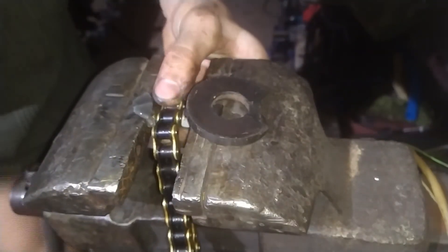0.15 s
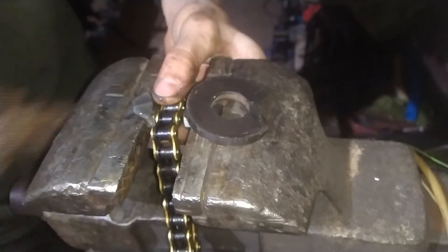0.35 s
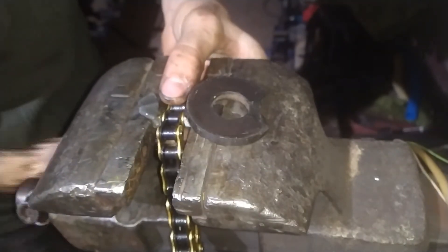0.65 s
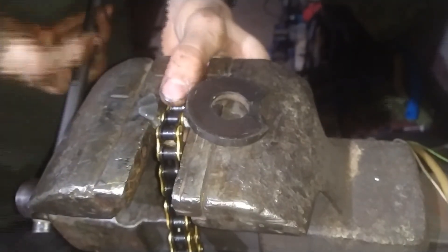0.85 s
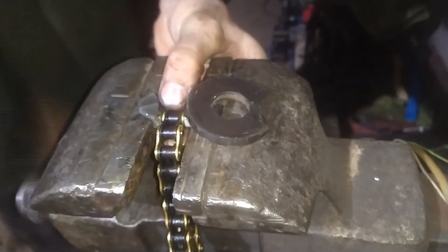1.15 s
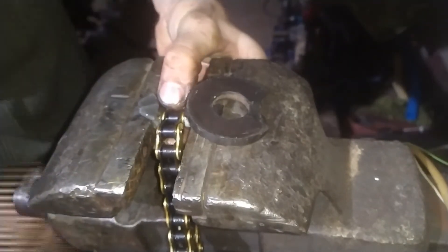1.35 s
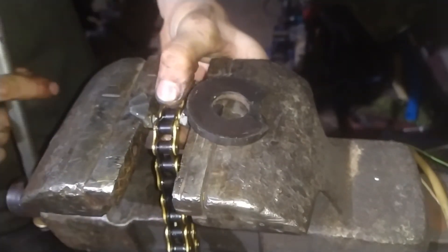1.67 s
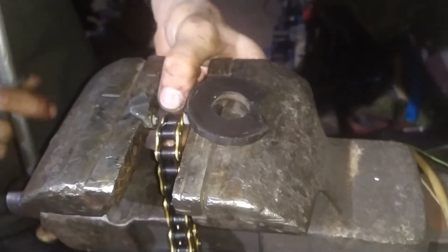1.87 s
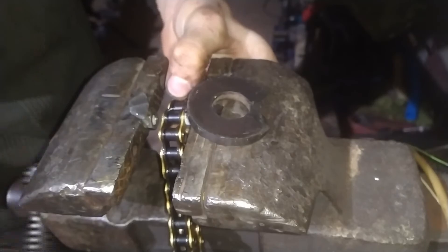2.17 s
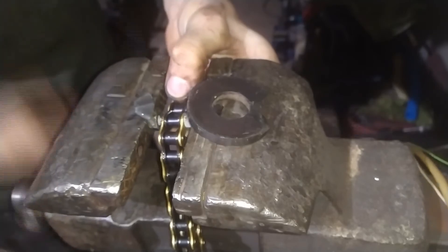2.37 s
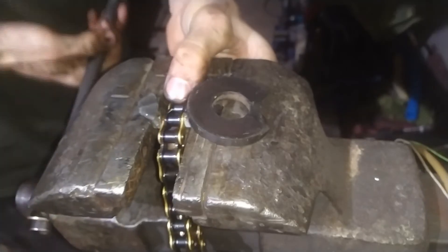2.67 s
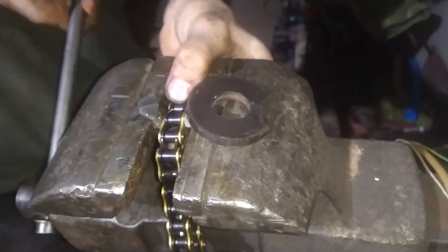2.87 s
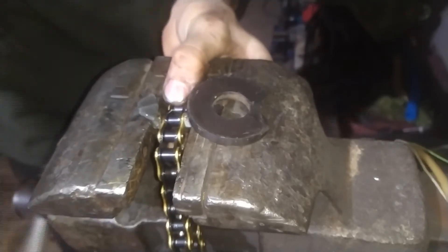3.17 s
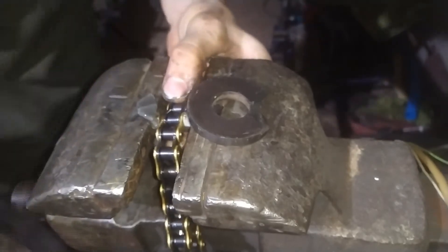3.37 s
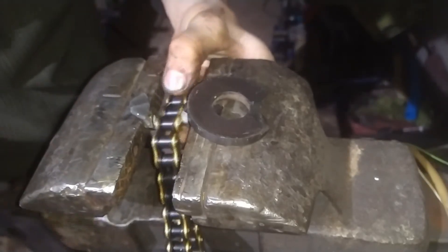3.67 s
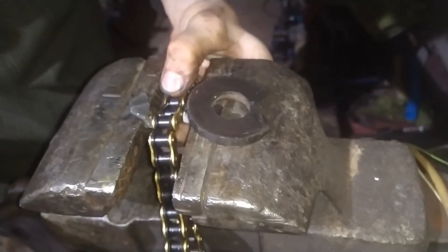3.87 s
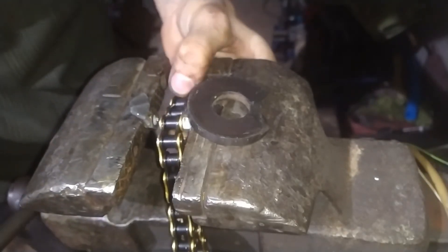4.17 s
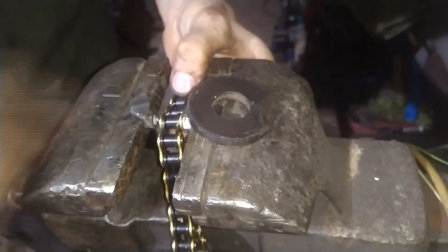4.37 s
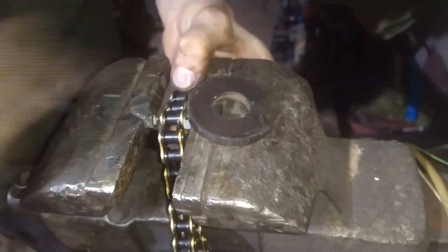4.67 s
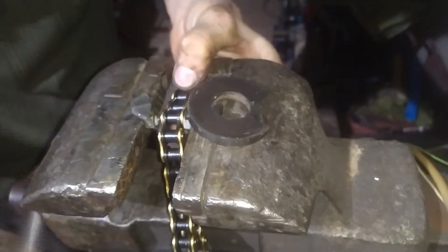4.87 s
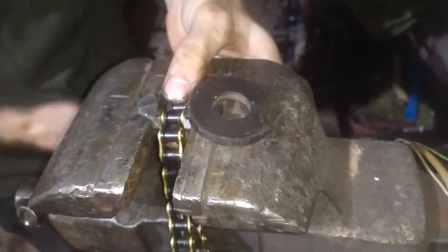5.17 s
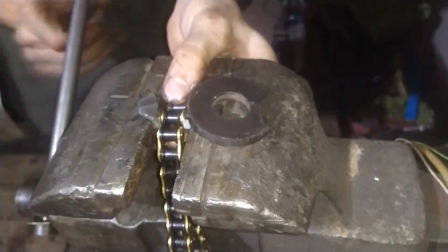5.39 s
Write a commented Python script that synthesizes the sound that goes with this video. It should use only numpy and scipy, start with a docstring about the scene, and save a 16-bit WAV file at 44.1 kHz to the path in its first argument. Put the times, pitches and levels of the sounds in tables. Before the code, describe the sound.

In a small quiet workshop, close to a steel vise, the turning screw rumbles and rubs unevenly. The loose jaw grinds and knocks the bench with dull thumps, the handle clacks sharply and slides, and chain links tick with tiny, very high rings. Activity is dense for the first three seconds, strongest around two and three, then thins to sparse clinks and a clack near the end. Short, nearly dry room tail.

```python
"""A roller chain is worked link by link through a steel bench vise in a small, quiet workshop.
Links tick, rebound and ring with one very high note: noise bursts and pairs of close, beating tones.
The loose jaw grinds and thumps the bench and the handle clacks and slides: shaped noise rings resonances.
The turning screw rumbles, rubs and hisses as uneven filtered noise, over still air and a low hum.
Near walls add a short tail to the contact sounds."""
import sys
import numpy as np
from scipy import signal
from scipy.fft import rfft, irfft
from scipy.io import wavfile
from scipy.ndimage import uniform_filter1d

SR = 44100
rng = np.random.default_rng(int(sys.argv[2]) if len(sys.argv) > 2 else 0)


def transcribe(u):
    """Save the signal u as a 16-bit wav file named by the first command-line argument.

    u: samples, shape (n,) or (channels, n), limited to [-1, 1]; the rate is SR.
    q: integer samples, one column per channel.
    """
    v = np.clip(np.atleast_2d(u).T, -1, 1)
    q = np.round(v * 32767).astype(np.int16)
    wavfile.write(sys.argv[1], SR, q)


N = 243873
TIME = np.arange(N) / SR
LEAD = SR // 20  # samples kept before each contact
AGE = np.arange(-LEAD, SR // 3) / SR  # seconds since a contact; negative before it

# In all tables, levels are starting points: each layer adds its own gain.
# Outlines and resonances only set a balance, because every filter is scaled to unit energy.
# fade_s is the time a resonance takes to fall by 60 dB.


def undb(db):
    """Turn decibels into gain."""
    return 10 ** (np.asarray(db) / 20)


def add(track, sound, s, pan_db=0, lag=0):
    """Mix one event into a stereo track, its contact at time s; it reaches the left lag samples late."""
    stereo = np.broadcast_to(sound, (2, len(AGE)))
    for channel, part, side in zip(track, stereo, (1, -1)):
        start = int(s * SR + side * lag / 2) - LEAD
        first, last = max(start, 0), min(start + len(AGE), N)
        channel[first:last] += undb(side * pan_db / 2) * part[first - start:last - start]


def through(x, response):
    """Pass a sound through an impulse response scaled to unit energy."""
    unit = response / np.sqrt(np.sum(response ** 2))
    return signal.fftconvolve(x, np.atleast_2d(unit), axes=1)[:, :N]


def colour(x, points, size=2048):
    """Shape the spectrum to a (pitch_hz, level_db) outline, without any sound ahead of its cause."""
    hz, db = np.transpose(points)
    bins_hz = np.arange(size // 2 + 1) * SR / size
    outline_db = np.interp(np.log(bins_hz + 1), np.log(hz), db)
    # folding the cepstrum makes the filter minimum phase
    cepstrum = irfft(np.log(undb(outline_db)))
    cepstrum[1:size // 2] *= 2
    cepstrum[size // 2 + 1:] = 0
    return through(x, irfft(np.exp(rfft(cepstrum))))


def envelope(rise_s, fall_s, hold_s=0):
    """Build up to the contact, hold, then die away; rise and fall are exponential time constants."""
    rise = np.minimum(AGE, 0) / max(abs(rise_s), 1e-4)
    fall = np.maximum(AGE - hold_s, 0) / max(abs(fall_s), 1e-4)
    return np.exp(rise - fall)


def grit(spread_db, size=12):
    """Dense tiny impacts: noise whose strength changes every size samples, scaled to rms 1."""
    steps = undb(spread_db * rng.standard_normal(len(AGE) // size + 1))
    strength = np.repeat(steps, size)[:len(AGE)]
    x = strength * rng.standard_normal(len(AGE))
    return x / x.std()


def walk(rate):
    """Glide between random levels, rate of them a second; the overall spread is near 2.2."""
    k = int(SR / rate)
    steps = np.repeat(rng.standard_normal(N // k + 1), k)
    return 2.7 * uniform_filter1d(steps, k)[:N]


def air(wide_hz):
    """Stereo noise: left and right are much alike in the bass and differ more above wide_hz."""
    mid, side = rng.standard_normal((2, N))
    high_pass = signal.butter(1, wide_hz, "high", fs=SR, output="sos")
    side = 0.19 * side + 0.79 * signal.sosfilt(high_pass, side)
    return np.array([mid + side, mid - side])


def room(x, wet_db, t60_s):
    """Bench and walls scatter a short noise tail, with a faint slower one under it."""
    t = AGE[LEAD:]
    decay = undb(-60 * t / t60_s) + undb(-49.5 - 60 * t / 0.97)
    build = 1 - np.exp(-t / 0.0066)
    tail = air(wide_hz=300)[:, :len(t)] * decay * build
    tail = signal.sosfilt(signal.butter(2, 250, "high", fs=SR, output="sos"), tail)
    return x + undb(wet_db) * through(x, tail)


def ring(x, modes, longest_s=.095):
    """Ring resonances with a sound; clamped, oily steel is never let to fade slower than longest_s."""
    t = AGE[LEAD:]
    response = sum(undb(db - 60 * t / min(fade_s, longest_s)) * np.cos(2 * np.pi * hz * t)
                   for hz, db, fade_s in modes)
    return through(x, response)


# outline of the still air: (pitch_hz, level_db)
SHOP_AIR = [(12, -41.5), (20, 6.5), (67, -1), (134, -1.5), (228, -11), (293, -11), (422, -16), (485, -12),
            (1260, -30.5), (9140, -25), (16000, -33.5)]


def shop_air(level_db=-69.5):
    """The air of the quiet shop is steady noise, strongest in the bass."""
    return undb(level_db) * colour(air(wide_hz=500), SHOP_AIR)


def hum(pitch_hz=50.6, level_db=-73):
    """A low, steady hum in the building is one sine tone."""
    return undb(level_db) * np.sin(2 * np.pi * pitch_hz * TIME)


# the screw turning, joined by straight lines: (start_s, rumble_db, rub_db)
SCREW_TURNING = [(0.0, -53, -69), (0.23, -61, -73.5), (0.52, -62, -74), (0.8, -70, -73), (1.05, -81, -71),
                 (1.25, -54.5, -69), (1.77, -78, -75.5), (2.05, -76.5, -76), (2.32, -61, -62.5),
                 (2.86, -86, -96), (3.02, -56.5, -77), (3.14, -65, -58), (3.34, -61, -67), (3.67, -66, -76),
                 (3.94, -69.5, -76), (4.77, -72, -79), (4.94, -58, -69), (5.53, -73, -82)]


def screw_levels(t):
    """Read the levels of the screw's rumble and rub at times t."""
    s, *columns = np.transpose(SCREW_TURNING)
    return [np.interp(t, s, column) for column in columns]


# outline of the screw's low rumble, also of the bench's shudder: (pitch_hz, level_db)
RUMBLE_OUTLINE = [(25, -19), (50, 5), (80, 8.5), (118, 7.5), (200, -6.5), (350, -13.5), (900, -38.5)]
# outline of the screw's rub, also of the body of the handle's scrape: (pitch_hz, level_db)
RUB_OUTLINE = [(150, -16), (350, 3), (900, 1), (1400, -5), (2200, -5), (4000, -10), (7000, -18.5)]
# outline of the thread's hiss, also of the handle's fine scrape: (pitch_hz, level_db)
HISS_OUTLINE = [(1500, -6.5), (4000, -2.5), (6500, -0.5), (9500, -3.5), (12000, -16), (15500, -14)]


def turning(rumble_gain_db=-1.5, rub_gain_db=-4, hiss_gain_db=-11):
    """The turning screw rumbles and rubs unevenly; its thread hisses, rising and falling with the rub."""
    rumble_db, rub_db = screw_levels(TIME)
    # each layer also flickers at its own random pace
    rumble_db = rumble_db + rumble_gain_db + 1.8 * walk(25)
    hiss_db = rub_db + hiss_gain_db + 0.76 * walk(120)
    rub_db = rub_db + rub_gain_db + 1.5 * walk(70)
    rumble = colour(air(wide_hz=400) * undb(rumble_db), RUMBLE_OUTLINE)
    rub = colour(air(wide_hz=600) * undb(rub_db), RUB_OUTLINE)
    hiss = colour(air(wide_hz=400) * undb(hiss_db), HISS_OUTLINE)
    return rumble + rub + hiss


def brushes(per_s=7, centre_hz=800, level_db=-1.5, length_s=.018, spread_octaves=1.0, spread_db=4.0):
    """Faint rubs at random moments follow the level of the screw's rub: rows like DULL_RUBS."""
    count = int(per_s * N / SR)
    when, pitch, size = rng.uniform(-1, 1, (count, 3)).T
    s = (np.arange(count) + (when + 1) / 2) / per_s
    hz = centre_hz * 2 ** (spread_octaves * pitch)
    db = screw_levels(s)[1] + level_db + spread_db * size
    return list(zip(s, hz, db, np.full(count, length_s)))


# dull rubs of hand and chain on the vise: (start_s, pitch_hz, level_db, length_s)
DULL_RUBS = [(0.246, 500, -49.5, .013), (0.325, 1020, -52, 0.024), (0.387, 920, -59, 0.041),
             (0.437, 260, -45.5, 0.013), (.633, 224, -40.5, 0.012), (0.704, 1630, -53, 0.02),
             (1.201, 1780, -44.5, .017), (1.332, 800, -49.5, .012), (1.485, 614, -64, 0.044),
             (2.097, 450, -54, 0.03), (2.212, 1100, -50, 0.0225), (2.271, 332, -44, 0.018),
             (2.468, 1100, -61, 0.014), (2.573, 1670, -62, 0.026), (2.767, 920, -56, 0.018),
             (2.962, 920, -52.5, 0.026), (3.037, 920, -63, 0.019), (3.166, 1840, -36, 0.021),
             (3.174, 199, -33.5, 0.019), (3.233, 2180, -55, 0.021), (3.373, 800, -65, 0.019),
             (3.589, 539, -64.5, 0.044), (3.82, 900, -66, 0.035), (4.378, 510, -56.5, 0.025),
             (5.393, 127, -58.5, 0.049)]
# hollow resonances rubbed by every jaw slip: (pitch_hz, level_db relative to grind_db in JAW_SLIPS)
SLIP_GROANS = [(215, -8.5), (1750, -14.5)]


def rubs(gain_db=-1, width=0.6, groan_s=0.011):
    """Each rub is grit around one hollow resonance: hand and chain, and the jaw whenever it slips."""
    out = np.zeros((2, N))
    groans = [(s, hz, grind_db + db, groan_s) for s, grind_db, *_ in JAW_SLIPS for hz, db in SLIP_GROANS]
    for s, hz, db, length_s in DULL_RUBS + groans + brushes():
        edges_hz = [hz / (1 + width / 2), hz * (1 + width / 2)]
        band = signal.butter(2, edges_hz, "band", fs=SR, output="sos")
        # its strength changes slightly every 2.5 ms
        rub = signal.sosfilt(band, grit(spread_db=0.5, size=110))
        shape = undb(db + gain_db) * envelope(0.0014, 0.0074, length_s)
        add(out, shape * rub / rub.std(), s, 0, rng.uniform(-14.5, 25))
    return room(out, wet_db=-6, t60_s=0.16)


# the handle slides through its eye: (start_s, level_db, length_s)
HANDLE_SLIDES = [(0.379, -69.5, .1), (0.864, -77, 0.23), (2.623, -64, 0.026), (2.803, -79.5, .14),
                 (3.224, -52, 0.0069), (3.39, -80, 0.17), (5.006, -69.5, 0.021), (5.169, -60.5, 0.041)]


def slides(gain_db=-1, body_db=-3):
    """Dry steel sliding on steel makes a fine scrape of gritty noise."""
    out = np.zeros((2, N))
    for s, db, length_s in HANDLE_SLIDES:
        add(out, undb(db + gain_db) * envelope(0.0069, 0.011, length_s) * grit(spread_db=5.0), s)
    scrape = colour(out, HISS_OUTLINE) + undb(body_db) * colour(out, RUB_OUTLINE)
    return room(scrape, wet_db=0.5, t60_s=0.3)


# resonances of the bench under the vise: (pitch_hz, level_db, fade_s)
BENCH_MODES = [(53, -7.5, 0.22), (99.4, -5, .15), (119.25, 3.5, 0.21), (157.6, -6.5, 0.22),
               (186, -2.5, 0.094), (244.7, -1.5, 0.093), (369.5, -11, .12), (527, -4.5, 0.058)]


def bench_boom(t):
    """The struck bench sounds its low resonances; each blow loads it a little differently."""
    boom = 0
    for k, (hz, db, fade_s) in enumerate(BENCH_MODES):
        level_chance, pitch_chance = rng.standard_normal(2)
        tone = np.sin(2 * np.pi * hz * (1 + 0.0093 * pitch_chance) * t)
        boom = boom + (-1) ** k * undb(db + 1.2 * level_chance - 60 * t / fade_s) * tone
    return (1 - np.exp(-t / .003)) * boom


# the jaw slips in its slide: (start_s, grind_db, rasp_db, thump_db, length_s)
JAW_SLIPS = [(.001, -37.5, -43.5, -40, 0.0026), (0.107, -58, -73, -54, 0.0024),
             (.424, -50.5, -51.5, -47.5, 0.015), (.505, -51, -51.5, -55.5, 0.012),
             (.628, -40.5, -65, -44.5, 0.0036), (1.055, -41, -39.5, -35, 0.0093),
             (1.16, -48.5, -49, -47, 0.0061), (1.202, -33, -43.5, -41.5, 0.0067),
             (1.334, -48, -58, -67, 0.0082), (1.486, -67, -92, -51, 0.014),
             (1.623, -66, -59.5, -70, 0.0052), (2.098, -54, -50, -60, .01),
             (2.171, -39.5, -59, -47, 0.0049), (2.265, -45, -45, -37.5, 0.01),
             (2.405, -47.5, -45.5, -54.5, 0.0035), (2.52, -61, -86, -44.5, 0.0032),
             (2.762, -71.5, -51, -58, 0.0079), (2.963, -62, -43, -53, 0.0157),
             (3.031, -67.5, -48, -53, 0.0092), (3.134, -47, -52.5, -50, 0.0015),
             (3.171, -33, -43.5, -36, 0.0129), (3.451, -49, -59.5, -42, .018),
             (4.49, -56.5, -64, -66.5, 0.0072), (4.766, -51, -63.5, -52.5, 0.015),
             (4.839, -45.5, -43, -53, 0.0175), (4.904, -59, -84, -53.5, 0.0035),
             (4.964, -59.5, -55.5, -66.5, .002), (5.083, -71.5, -81, -55, 0.0047)]
# outline of the jaw's grind: (pitch_hz, level_db)
GRIND_OUTLINE = [(120, -18), (280, 1.5), (430, 6.5), (560, 5), (850, 4.5), (1300, -4.5), (1800, -4),
                 (2500, -10.5), (5000, -23), (12000, -45.5)]
# outline of the jaw's brighter rasp: (pitch_hz, level_db)
RASP_OUTLINE = [(700, -36), (1800, -2), (2700, 2.5), (4200, 0), (5500, -8.5), (8000, -17.5), (11000, -24),
                (15000, -38.5)]
# resonances of the cast jaw, fade capped by ring(): (pitch_hz, level_db, fade_s)
JAW_MODES = [(559, -3.5, .16), (835, 2.5, 0.16), (920, 1.5, 0.099), (1049, -2.5, 0.05), (1630, 0.5, 0.056),
             (2203, 3.5, 0.17), (2485, 3, 0.3), (2600, -1, 0.082), (3470, -1.5, 0.3), (4200, -12.5, 0.081)]


def knocks(grind_gain_db=-3, rasp_gain_db=-2, thump_gain_db=0, shudder_gain_db=-7, late_s=0.00046, jaw_db=-12):
    """The jaw grinds over its slide; partway through each slip the heavy bench thumps."""
    grind, rasp, thump, shudder = np.zeros((4, 2, N))
    for s, grind_db, rasp_db, thump_db, slip_s in JAW_SLIPS:
        slip, lag = envelope(.0054, .0095, slip_s), rng.uniform(-7.5, 1)
        add(grind, undb(grind_db + grind_gain_db) * slip * grit(spread_db=2.5), s, .8, lag)
        add(rasp, undb(rasp_db + rasp_gain_db) * slip * grit(spread_db=5.5), s, .5, lag)
        tremble = envelope(0.013, 0.029, slip_s) * air(wide_hz=249.7)[:, :len(AGE)] / 2
        add(shudder, undb(thump_db + shudder_gain_db) * tremble, s, 2)
        # the thump starts just after the middle of the slip
        since_thump = np.maximum(AGE - late_s - slip_s / 2, 0)
        add(thump, undb(thump_db + thump_gain_db) * bench_boom(since_thump), s, 2.3, -14)
    scrape = colour(grind, GRIND_OUTLINE) + colour(rasp, RASP_OUTLINE)
    scrape = scrape + undb(jaw_db) * ring(grind, JAW_MODES)
    return room(scrape, wet_db=-4, t60_s=0.11) + thump + colour(shudder, RUMBLE_OUTLINE)


# the loose jaw is jarred and rings: (start_s, level_db)
JAW_JARS = [(.254, -43.5), (1.154, -56), (2.105, -56), (2.175, -34.5), (2.215, -48), (2.735, -55),
            (2.765, -45), (2.960, -58), (2.976, -40), (3.031, -47), (3.172, -35), (4.777, -49),
            (5.478, -57.5)]


def jars(gain_db=23, buzz_db=-27, uneven_db=3, detune=0.011):
    """A blow and a brief buzz ring the cast jaw; each spot and grip favours other resonances."""
    out = np.zeros((2, N))
    for s, db in JAW_JARS:
        blow = (AGE == 0) + undb(buzz_db) * envelope(0.0025, 0.015) * grit(spread_db=8.5)
        modes = [(hz * (1 + detune * rng.normal()), mode_db + uneven_db * rng.normal(), fade_s)
                 for hz, mode_db, fade_s in JAW_MODES]
        rung = ring(blow[None], modes)[:, :len(AGE)]
        add(out, undb(db + gain_db) * rung, s, 0, rng.uniform(-15.5, 3.5))
    return room(out, wet_db=-7.5, t60_s=.1)


# rattling clacks of the handle and chain: (start_s, level_db, left_minus_right_db)
RATTLING_CLACKS = [(.003, -42, -1), (.239, -44.5, -3), (.252, -42, -1.5), (.357, -51.5, -7),
                   (2.108, -50, -4.5), (2.162, -38.5, -6), (2.1731, -27.5, -5.5), (2.177, -28.5, 6),
                   (3.712, -56, -1), (4.770, -45, -8), (4.778, -37, -1.5)]
# outline of a clack: (pitch_hz, level_db)
CLACK_OUTLINE = [(300, -12), (1000, -7), (3100, -13), (4300, 0), (5200, -14), (6700, 3), (7300, 1),
                 (7900, -5), (8800, 0), (10600, -7), (11700, 0), (13500, -15), (14600, -3), (16000, -16)]
# resonances of the clacking steel, fade capped by ring(): (pitch_hz, level_db, fade_s)
STEEL_MODES = [(4280, -5.5, 0.39), (4430, -13.5, 0.083), (4580, -22, 0.15), (5076, -31.5, 0.17),
               (5340, -12.5, 0.28), (6200, -21.5, 0.12), (6770, 16, 0.2), (7060, -3.5, 0.064),
               (7560, -4.5, 0.042), (7940, -9, 0.048), (8340, -8.5, 0.087), (9080, -5.5, 0.12),
               (9082, -18.5, 0.084), (8570, 8.5, 0.046), (9930, 6, 0.059), (9800, -13, 0.058),
               (10120, -25, 0.065), (11140, -20, 0.042), (11290, -29, 0.13), (10700, -3.5, 0.027),
               (12100, -9.5, 0.06), (11700, -5.5, 0.077), (13010, -12, 0.065), (14200, -13, 0.04),
               (14800, -5, 0.033), (14850, -39.5, 0.11)]


def clacks(gain_db=2.0, ring_db=-8):
    """A rattle swells up to a sharp blow, then dies away after it; both ring the steel."""
    out = np.zeros((2, N))
    blow, rattle = envelope(.0003, .002), .4 * envelope(.0059, .008)
    for s, db, pan_db in RATTLING_CLACKS:
        add(out, undb(db + gain_db) * (blow + rattle) * grit(spread_db=5.5), s, pan_db, rng.uniform(-2, 2))
    clack = colour(out, CLACK_OUTLINE) + undb(ring_db) * ring(out, STEEL_MODES)
    return room(clack, wet_db=-3.5, t60_s=0.09)


# outline of a link's tick: (pitch_hz, level_db)
TICK_OUTLINE = [(200, -6.5), (700, -7), (1500, -8.5), (2400, 0), (3300, -11), (4400, 3.5), (5400, -0.5),
                (7000, 7), (9000, 8), (10700, 17), (13000, -3.5), (15500, 0)]
# a chain link drops into place: (start_s, ring_db, chatter_s, crack_db, rebound_crack_db, rattle_db,
# left_minus_right_db); ticks() uses a fifth of the last column, tings() all of it
LINK_DROPS = [(.350, -47, .014, -66, -57, -46.5, -1), (.798, -69.5, .011, -59, -57.5, -74, 1),
              (.995, -80, 0.0039, -49.5, -83, -55.5, -17.5), (1.138, -51.5, 0.017, -42, -49, -49, 2),
              (1.193, -52, 0.02, -43.5, -34, -64, -10), (1.335, -71, .003, -38, -69, -42.5, -13),
              (1.692, -33.5, 0.02, -46, -60.5, -49, -3), (1.733, -40.5, 0.0085, -64, -68, -47.5, -1.5),
              (2.294, -32, .022, -34, -35, -55, -5), (2.553, -52, 0.012, -64, -58, -62, 0.5),
              (2.7630, -42, 0.0022, -41, -45, -43, -3), (3.029, -40, 0.023, -55, -47.5, -46, -3),
              (3.104, -46.5, 0.017, -46, -41.5, -50, -4), (3.205, -72, .003, -45, -58, -53, -13),
              (3.264, -43, .004, -37, -41.5, -47.5, -5.5), (3.594, -36, 0.013, -59, -43, -48, -16),
              (3.650, -57.5, 0.034, -74, -66, -57, -6), (3.699, -38.5, 0.015, -55, -45.5, -47.5, -3),
              (4.3762, -37.5, 0.02, -39.5, -47, -39, -11.5), (5.289, -50.5, .0065, -51.5, -54, -46, 2),
              (5.375, -76, .002, -59, -77, -59, -2), (5.468, -48.5, 0.007, -55, -57, -49.5, 0)]


def ticks(snap_db=19, crackle_db=5, pan_share=0.2, steel_db=-11, rebound_s=.0162, rebound_rattle_db=-17.5):
    """A link lands with a snap and a brief crackle, buzzes against its neighbours, and rebounds once."""
    out = np.zeros((2, N))
    contact = envelope(.0001, .0014)
    for s, _, _, crack_db, rebound_db, rattle_db, pan_db in LINK_DROPS:
        landing = (s, crack_db, rattle_db, pan_share * pan_db)
        rebound = (s + rebound_s, rebound_db, rattle_db + rebound_rattle_db, 0)
        for at, hit_db, buzz_db, side_db in (landing, rebound):
            crack = undb(snap_db) * (AGE == 0) + undb(crackle_db) * contact * grit(spread_db=-2.5)
            rattle = undb(buzz_db) * envelope(0.0067, 0.012) * grit(spread_db=9.0)
            add(out, undb(hit_db) * crack + rattle, at, side_db, rng.uniform(-1.9, 3))
    tick = colour(out, TICK_OUTLINE) + undb(steel_db) * ring(out, STEEL_MODES, longest_s=.05)
    return room(tick, wet_db=-1.0, t60_s=0.052)


def tings(pitch_hz=10495, scatter_hz=19, twin_db=-13, split_hz=62, right_phase=1.36, flutter_db=1.63):
    """Chatter keeps a link's pair of close tones ringing; they beat, and die quickly once it is seated."""
    out = np.zeros((2, N))
    rise_s, main_fall_s, twin_fall_s = 0.0032, 0.0072, 0.013
    for s, db, chatter_s, _, _, _, pan_db in LINK_DROPS:
        # all links ring with nearly the same note; the right side is shifted in phase (radians)
        note_hz = pitch_hz + scatter_hz * rng.normal()
        turn = 2 * np.pi * note_hz * AGE + np.array([[0], [right_phase]])
        main = np.sin(turn) * envelope(rise_s, main_fall_s, chatter_s)
        twin = np.sin(turn + 2 * np.pi * split_hz * AGE) * envelope(rise_s, twin_fall_s, chatter_s)
        chatter_db = flutter_db * walk(180)[:len(AGE)]
        add(out, undb(db + 6 + chatter_db) * (main + undb(twin_db) * twin), s, pan_db)
    return room(out, wet_db=-19.0, t60_s=0.049)


def scene():
    """Add all the noises of vise and chain to the still air of the shop."""
    background = shop_air() + hum()
    vise = turning() + rubs() + slides() + knocks() + jars()
    chain = clacks() + ticks() + tings()  # the clacks include the handle
    return background + vise + chain


def record(dry):
    """The recorder cuts the deepest bass and the top."""
    dry = signal.sosfilt(signal.butter(2, 36, "high", fs=SR, output="sos"), dry)
    return signal.sosfilt(signal.ellip(10, .2, 70, 15900, fs=SR, output="sos"), dry)


dry = scene()
out = record(dry)
transcribe(out)
```